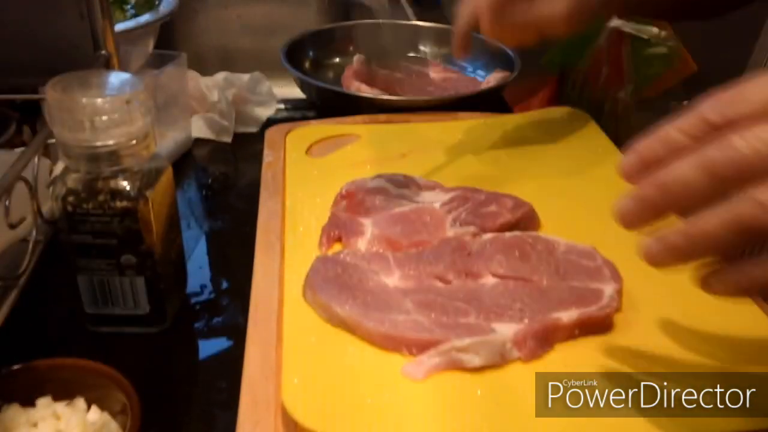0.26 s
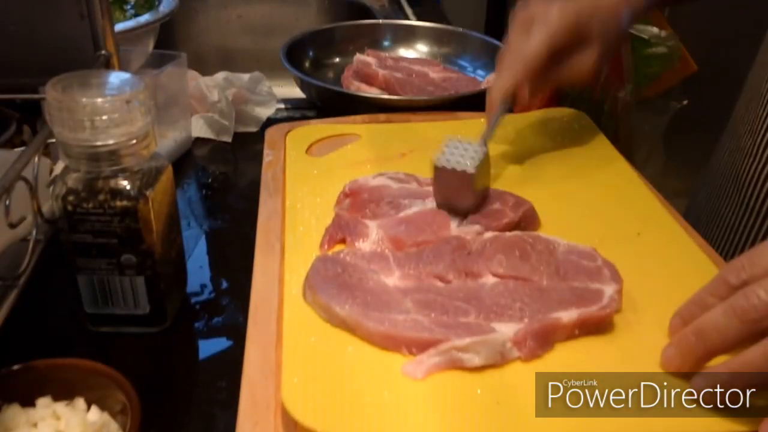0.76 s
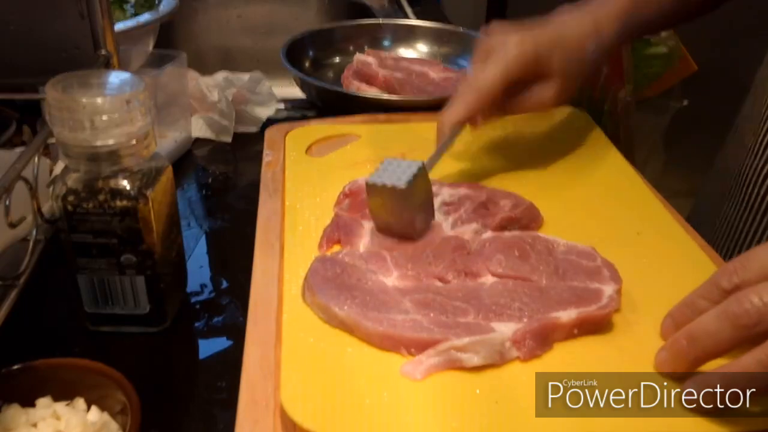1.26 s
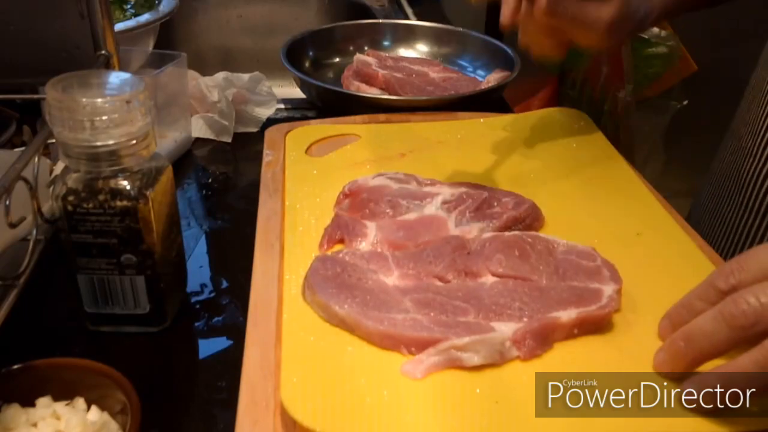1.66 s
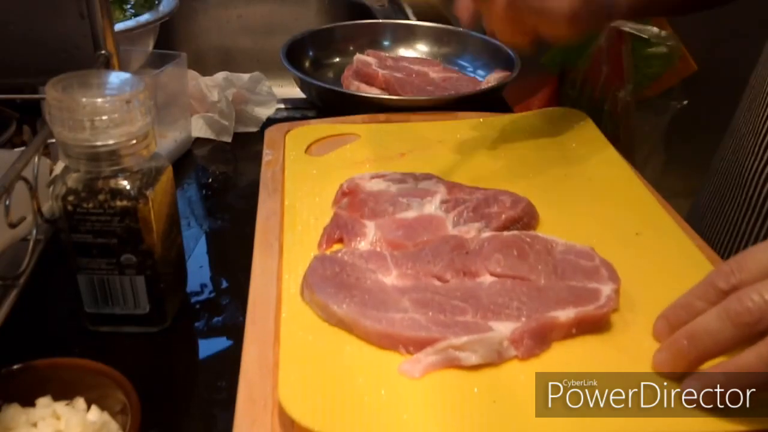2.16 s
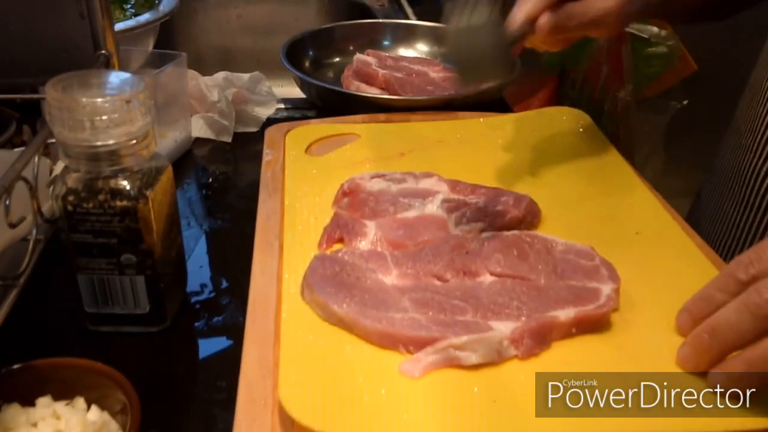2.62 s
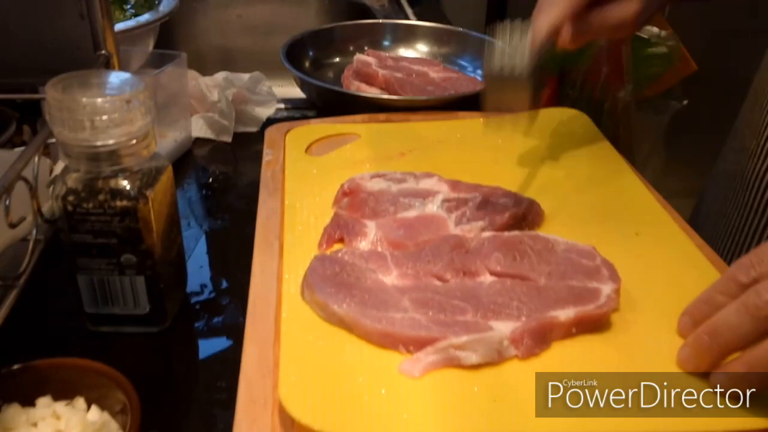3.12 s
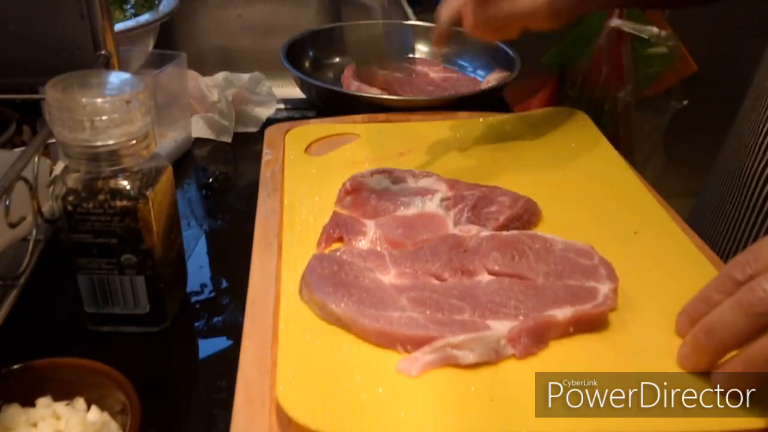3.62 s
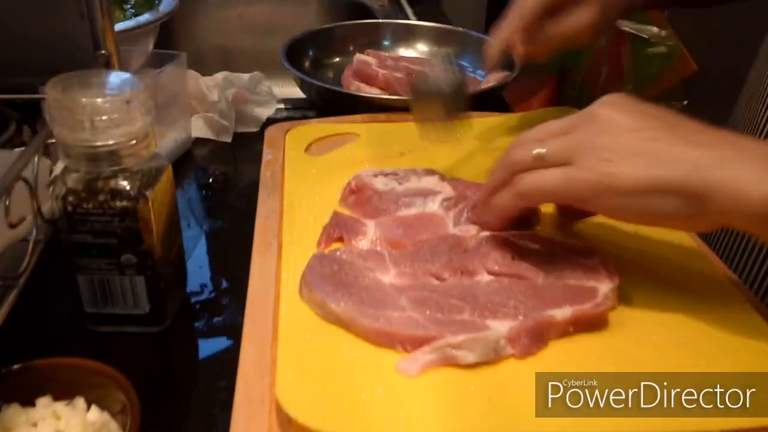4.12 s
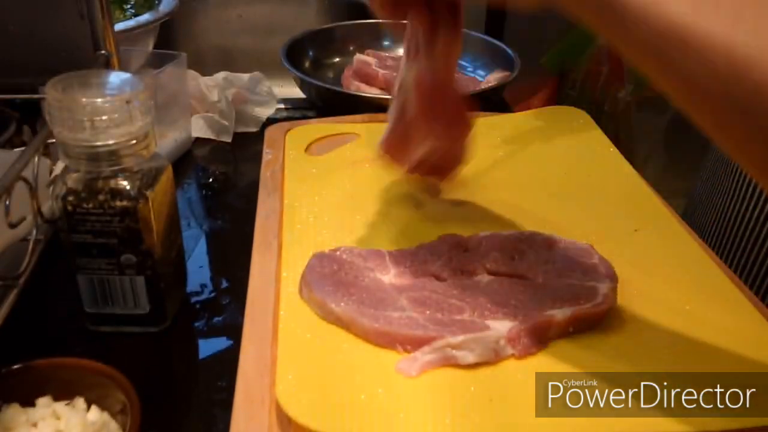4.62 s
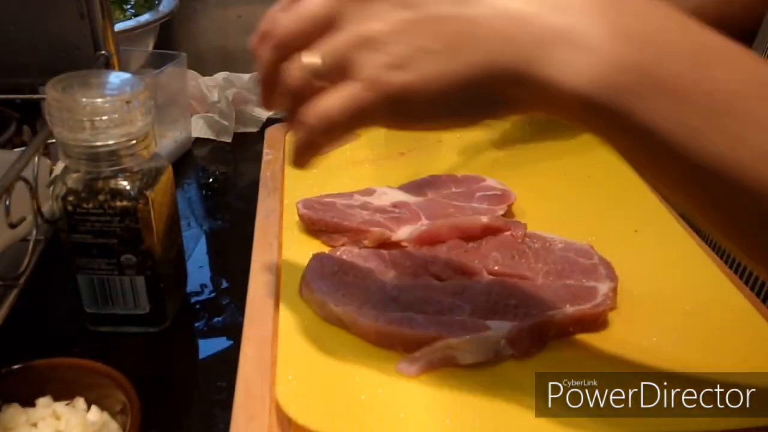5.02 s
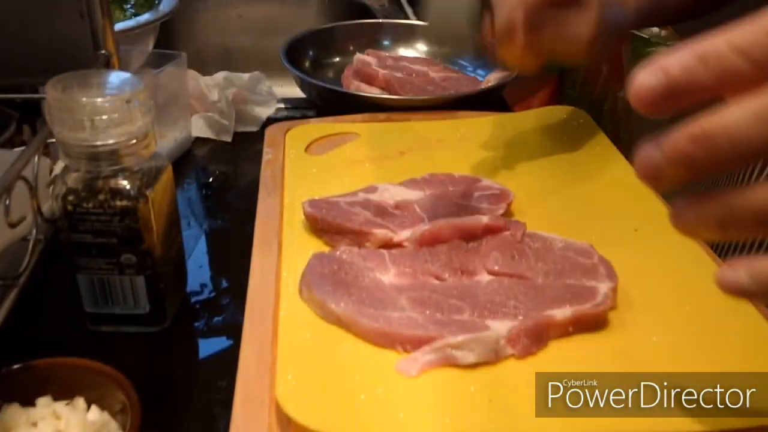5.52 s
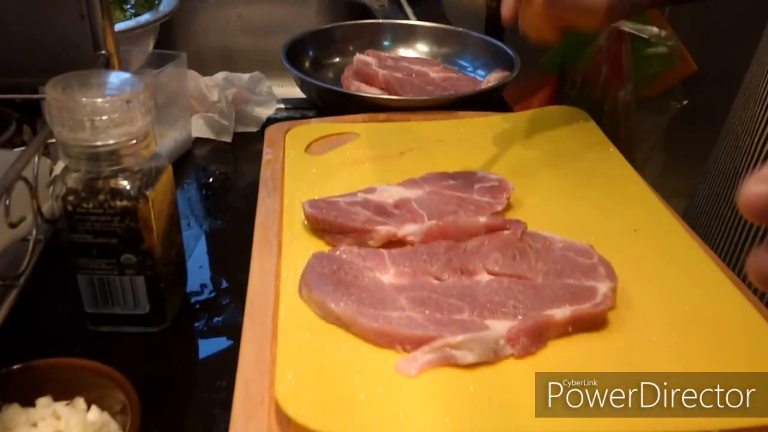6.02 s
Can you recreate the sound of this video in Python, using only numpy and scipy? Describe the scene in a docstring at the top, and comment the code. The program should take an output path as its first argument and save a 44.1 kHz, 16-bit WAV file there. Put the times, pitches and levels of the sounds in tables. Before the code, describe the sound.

A small kitchen, heard close in stereo, with constant low appliance hum and faint air hiss. At 0.16 s there is a soft pat of hand or meat; from about 0.38 s a toothed metal mallet strikes raw meat every quarter second, sixteen blows until 4.24 s. Each is a short wet crack with a squelchy edge, followed within hundredths of a second by hollow clattering knocks of plastic board on wooden block and a round low thump of the counter. The blows at 0.38 and 2.19 s slap harder; others are duller. Tiny wet ticks fall between. Around 4.02-4.1 s a glass jar clinks thinly. From 4.4 to 4.8 s the slice peels away in fine sticky crackles; a very faint far tone comes and goes until 5.06 s. A soft pat at 5.17 s lays it down, then four blows at 5.28, 5.54, 5.8 and 6.07 s, the last sharpest.

```python
"""A metal meat mallet pounds a pork slice on a plastic board, loose on a wooden block, in a small kitchen.
Each blow is a wet slap of noise with a squelching band; knocks ring board and block; counter modes thump below.
In a pause the slice is peeled off and turned in fine crackles; a jolted glass jar clinks with a few sine modes.
Steady hum and hiss of shaped noise, a faint far tone and dense noise-like room echoes fill the background.
Two close microphone ports listen, the right one shaded and a little behind."""
import sys
import numpy as np
from scipy import signal
from scipy.fft import rfft, irfft
from scipy.io import wavfile

SR = 44100
rng = np.random.default_rng(int(sys.argv[2]) if len(sys.argv) > 2 else 0)


def materialize(psi):
    """Save the field psi as 16-bit PCM at rate SR to the path in sys.argv[1].

    A 1-D psi becomes a single channel; in a 2-D psi each row is a channel.
    """
    bounded = np.clip(np.atleast_2d(psi).T, -1, 1)
    quanta = np.round(bounded * 32767).astype(np.int16)
    wavfile.write(sys.argv[1], SR, quanta)


N = 276507

# mallet blows, with their push on block and counter: start_s, slap_db, slap_brightness_db, squelch_hz,
# push_db, counter_tilt_db_per_octave
BLOWS = [(0.376, -16.5, -6.5, 6400, -25.5, -7.5), (0.6421, -23.5, 6, 6850, -24.5, -14.5),
         (0.9201, -28, 2.5, 5930, -29, -14.5), (1.1752, -36, 5, 4020, -26, -3.5),
         (1.4407, -25.5, -0.5, 5960, -30, -14.5), (1.71, -36, 0, 3910, -27, -9.5),
         (1.956, -28.5, -5.5, 5650, -29.5, -12), (2.192, -18.5, -9, 6630, -25.5, -7),
         (2.4541, -27, 2, 4660, -28.5, -10.5), (2.6945, -28, 1, 3480, -28, -4),
         (2.9547, -26.5, -0.5, 3560, -26.5, -12.5), (3.2288, -25, -8.5, 4020, -24.5, -9),
         (3.4682, -25, -11, 3860, -23, -8), (3.7196, -24.5, 6, 6520, -29, -6),
         (3.9653, -24, -5.5, 3530, -25, -11), (4.2391, -25.5, -5, 5760, -27, -6.5),
         (5.282, -24, 0.5, 3600, -25, -13), (5.5418, -26, 1, 3780, -26.5, -9.5),
         (5.8031, -23.5, -2.5, 3600, -31, -12), (6.0705, -16.5, -6.5, 5500, -26.5, -12.5)]

OPPOSITE = np.array([[1], [-1]])    # signs of a difference between left and right port


def from_db(db):
    """Decibels to gain."""
    return 10 ** (np.asarray(db) / 20)


def rms_one(x):
    """Scales to unit rms."""
    return x / np.sqrt(np.mean(x ** 2) + 1e-20)


def at_hz(points, hz):
    """Reads a (Hz, value) table on a log-frequency axis."""
    points_hz, values = np.array(points).T
    return np.interp(np.log(np.maximum(hz, 1)), np.log(points_hz), values)


def fft_hz():
    """Frequencies of the bins of a full-length spectrum."""
    return np.fft.rfftfreq(N, 1 / SR)


def resonate(x, hz, width_hz):
    """Two-pole resonance with gain of about 1 at its peak."""
    r = np.exp(-np.pi * width_hz / SR)
    zeros = np.array([1, 0, -1]) * (1 - r * r) / 2
    poles = [1, -2 * r * np.cos(2 * np.pi * hz / SR), r * r]
    return signal.lfilter(zeros, poles, x)


def high_pass(x, hz, order=1):
    """Butterworth high-pass."""
    return signal.sosfilt(signal.butter(order, hz, "high", fs=SR, output="sos"), x)


def add(out, start_s, sound):
    """Mixes a sound in at a time."""
    i = round(start_s * SR)
    out[..., i:i + sound.shape[-1]] += sound[..., :N - i]


def coloured(x, spectrum):
    """Shapes a signal by a spectrum whose mean power is set to 1."""
    gain = from_db(at_hz(spectrum, fft_hz()))
    return irfft(rfft(x) * rms_one(gain), N)


def burst(t60, rise_s, lumpy_db, first_db, bright_db, corner_hz, snap, snap_s):
    """A first hard contact, then lumpy noise that snaps up, drops and dies away, all within 0.2 s."""
    t = np.arange(int(.2 * SR)) / SR
    lumps = from_db(lumpy_db * np.minimum(rng.exponential(1, len(t)), 4))
    noise = rms_one(rng.standard_normal(len(t)) * lumps)
    rise = 1 - np.exp(-t / rise_s)
    decay = from_db(-60 * t / max(t60, .004))
    noise = noise * rise * decay * (1 + snap * np.exp(-t / snap_s))
    noise[0] = from_db(first_db)
    # the part above the corner is raised or lowered
    return noise + (from_db(bright_db) - 1) * high_pass(noise, corner_hz)


def hum():
    """Steady appliance hum and air noise, alike in both ports only in the bass."""
    # long-term colour of hum and air: frequency_hz, relative_level_db (per Hz)
    hum_spectrum = [(18, -66), (30, -8), (100, 5.5), (190, -13.5), (300, -4.5), (387, -9), (473, -20.5),
                    (536, -8.5), (724, -17.5), (800, -12.5), (907, -17), (1540, -20), (2900, -27.5),
                    (3600, -34), (6500, -40), (8000, -49.5), (12000, -51.5), (15600, -85.5), (22000, -120)]
    # how alike the ports hear it: frequency_hz, left_right_likeness (0 to 1)
    likeness = [(60, 0.98), (300, .9), (1000, 0.25), (3000, .2)]
    level_db = -53.5
    alike = np.clip(at_hz(likeness, fft_hz()), 0, 1)
    mid, side = rfft(coloured(rng.standard_normal((2, N)), hum_spectrum))
    ports = np.sqrt((1 + alike) / 2) * mid + np.sqrt((1 - alike) / 2) * side * OPPOSITE
    return from_db(level_db) * irfft(ports, N)


def slaps():
    """Many teeth squeeze juice and air out at once: a bright crack with one squelching band."""
    # softer pats of meat or hand, no push behind them: start_s, slap_db, slap_brightness_db, squelch_hz
    pats = [(0.1624, -27.5, 0.5, 3680), (5.1738, -36, 5, 6740)]
    # single teeth or wet fibres ticking apart from a blow: start_s, level_db
    ticks = [(0.208, -38.5), (0.209, -51), (1.0075, -48), (2.172, -51), (2.1819, -37.5), (2.186, -53),
             (2.773, -50), (3.0335, -63), (3.963, -37.5), (5.169, -42)]
    # colour of wet metal on meat: frequency_hz, relative_level_db (per Hz)
    slap_colour = [(180, -37.5), (300, -7.5), (1610, -7), (1900, -6), (3130, -5), (4160, -9), (4830, -7),
                   (6520, -8.5), (8360, -12.5), (12500, -11), (16000, -28)]
    slap_t60_s, tick_t60_s = 0.074, 0.015
    squelch_db, squelch_width_hz = -2, 570
    squelch_per_db, squelch_from_db = 0.37, -29.5     # harder slaps squelch more
    out = np.zeros((2, N))
    for start_s, level_db, bright_db, squelch_hz, *_ in BLOWS + pats:
        shared, apart = [burst(slap_t60_s, rise_s=0.0008, lumpy_db=1.1, first_db=7, bright_db=bright_db,
                               corner_hz=3000, snap=1.4, snap_s=0.0022) for _ in range(2)]
        crack = shared + 0.71 * apart * OPPOSITE      # the teeth are spread out, so the ports differ a little
        squelch_gain = from_db(squelch_db + squelch_per_db * (level_db - squelch_from_db))
        squelch = squelch_gain * resonate(crack, squelch_hz, squelch_width_hz)
        add(out, start_s, from_db(level_db) * (crack + squelch))
    for start_s, level_db in ticks:
        tick = burst(tick_t60_s, rise_s=0.0002, lumpy_db=2.6, first_db=8.5, bright_db=6.5,
                     corner_hz=2500, snap=1.03, snap_s=.002)
        add(out, start_s, from_db(level_db) * tick)
    return coloured(out, slap_colour)


def kitchen(x):
    """Echoes too dense to tell apart: stored power in each third-octave dies by the room's t60, heard as noise."""
    # how long the small kitchen rings: frequency_hz, t60_s
    room_t60 = [(150, 0.68), (500, 0.27), (1500, 0.22), (3000, 0.29), (4500, 0.24), (6500, 0.26),
                (8500, 0.21), (15000, 0.22)]
    # how alike the echoes reach both ports: frequency_hz, left_right_likeness (0 to 1)
    likeness = [(150, 0.71), (600, 0.79), (1500, 0.077), (4000, .1)]
    arrive_s = 0.00069      # the first echoes need time to arrive
    arrive = np.exp(-1 / (arrive_s * SR))
    out, edges_hz = 0, 150 * 2 ** (np.arange(21) / 3)
    white = rng.standard_normal((2, 2, N))      # neighbouring bands get unrelated noise
    for k, (low, high) in enumerate(zip(edges_hz, edges_hz[1:])):
        band = signal.butter(2, [low, high], "band", fs=SR, output="sos")
        mid, side = rms_one(signal.sosfilt(band, white[k % 2]))
        alike = np.clip(at_hz(likeness, low), 0, 1)
        keep = from_db(-120 / at_hz(room_t60, np.sqrt(low * high)) / SR)     # acts on power, hence 120
        power = signal.lfilter([1 - arrive], [1, -arrive], signal.sosfilt(band, x) ** 2)
        stored = signal.lfilter([1 - keep], [1, -keep], power)
        ports = np.sqrt(1 + alike) * mid + np.sqrt(1 - alike) * side * OPPOSITE
        out = out + np.sqrt(stored) * ports
    return out


def ring(contacts, modes):
    """Contacts ring a set of damped modes with alternating signs."""
    return sum((-1) ** k * from_db(db) * resonate(contacts, hz, width_hz)
               for k, (hz, width_hz, db) in enumerate(modes))


def knocks():
    """Bounces clatter and ring the damped modes of board and block; each push shakes block and bowl."""
    # board knocking on the block: start_s, drive_db, clatter_t60_s
    board_knocks = [(0.376, -7, 0.18), (0.391, -8, 0.12), (0.41, -2, 0.12), (0.647, 3.5, 0.082),
                    (0.656, -4, 0.11), (0.675, 1.5, 0.087), (0.921, -13.5, 0.16), (0.942, -2.5, 0.074),
                    (1.177, -16, 0.12), (1.195, -1, 0.067), (1.454, -3, 0.033), (1.466, -2, 0.069),
                    (1.712, -13.5, 0.17), (1.727, -4, 0.06), (1.978, -8, 0.11), (2.196, 2, 0.082),
                    (2.22, 4, 0.05), (2.233, -4, 0.041), (2.456, -2.5, 0.047), (2.474, -4, 0.095),
                    (2.696, -20, 0.15), (2.713, -7, 0.078), (2.955, -9, 0.12), (2.97, -3, 0.044),
                    (2.991, -6.5, 0.069), (3.23, -9.5, 0.16), (3.24, -5, 0.097), (3.473, -16, 0.13),
                    (3.483, -3, 0.13), (3.49, -5.5, 0.096), (3.723, -2, 0.12), (3.745, -0.5, 0.03),
                    (3.967, 5, 0.038), (3.982, -1.5, 0.098), (3.992, 4.5, 0.077), (4.249, -6, 0.14),
                    (4.263, -0.5, 0.087), (5.177, -29, 0.057), (5.243, -29.5, 0.09), (5.285, 3, 0.065),
                    (5.315, -0.5, 0.15), (5.539, -11.5, 0.2), (5.571, 1.5, 0.069), (5.802, -15.5, 0.24),
                    (5.844, -14, 0.038), (6.081, -5.5, 0.16), (6.101, 0, 0.092)]
    # modes of the plastic board on its block: pitch_hz, width_hz, level_db
    board_modes = [(627.6, 260, -3.5), (684, 98, 5.5), (773, 55, -0.5), (975, 160, -1.5), (1210, 77, -3.5),
                   (1540, 190, -1), (1886, 174, 2), (1927, 224, -2.5), (2260, 340, -6), (2520, 450, -11),
                   (3150, 160, -10.5), (4280, 210, -19)]
    # low modes of the wooden block, shaken by each push: pitch_hz, width_hz, level_db
    block_modes = [(185, 6.8, -1.5), (216, 14, 0.5), (284, 23, 0), (314.5, 13.1, 8), (353, 23, 1.5),
                   (438.7, 29.5, 0.5), (527, 9.4, 1)]
    # a steel bowl on the counter hums after each push: pitch_hz, width_hz, level_db
    bowl_modes = [(545, 3.2, -7)]
    # sharper modes of the wooden block, rung by the knocks: pitch_hz, width_hz, level_db
    linger_modes = [(654, 13, 0.5), (756, 8, -7.5), (814, 5.4, -9.5), (955, 28, -6.5), (1044, 10, 0.5),
                    (1270, 10, -7), (1623, 47, -5.5), (1732, 44, -4), (1810, 4.8, -13), (2130, 46, -14.5),
                    (2490, 15, -14.5), (3160, 14, -18.5)]
    # harder knocks are brighter, those further in time from a blow duller
    knock_bright_db, bright_per_db, dulling_db_per_s = 1, 0.87, 201
    block_lag_s, block_t60_s, block_over_push_db = 0.00802, 0.12, 22.5
    out = np.zeros((2, N))
    pushes, bounces = np.full((2, N), 1e-18)
    blow_s = np.array(BLOWS)[:, 0]
    for start_s, level_db, t60 in board_knocks:
        from_blow_s = np.min(np.abs(start_s - blow_s))
        bright_db = knock_bright_db + bright_per_db * level_db - dulling_db_per_s * from_blow_s
        shared, apart = [burst(t60, rise_s=0.0015, lumpy_db=2.7, first_db=19.5, bright_db=bright_db,
                               corner_hz=1280, snap=1.0, snap_s=0.0024) for _ in range(2)]
        # the board is wide, so the ports hear partly different contacts, but long waves reach both alike
        apart = high_pass(apart, 1200)
        contacts = from_db(level_db) * (shared + 0.97 * apart * OPPOSITE)
        # hand and meat detune the modes from blow to blow; here each knock draws afresh
        spread_db, detune = rng.standard_normal((2, len(board_modes))) * [[1.5], [.03]]
        varied = [(hz * (1 + detune[k]), width_hz, db + spread_db[k])
                  for k, (hz, width_hz, db) in enumerate(board_modes)]
        add(out, start_s, ring(contacts, varied))
        add(bounces, start_s, from_db(level_db) * shared)
    for start_s, *_, push_db, _ in BLOWS:
        shake = burst(block_t60_s, rise_s=0.002, lumpy_db=3.9, first_db=15, bright_db=-8.5,
                      corner_hz=1280, snap=.3, snap_s=0.0043)
        add(pushes, start_s + block_lag_s, from_db(push_db + block_over_push_db) * shake)
    return out + ring(pushes, block_modes + bowl_modes) + ring(bounces, linger_modes)


def thumps():
    """The meat cushions the blow to a smooth push that swells the counter's low modes in step."""
    # low modes of the counter: pitch_hz, level_db, t60_s
    counter_modes = [(53, -10, 0.27), (64.43, -0.5, 0.35), (89.5, 4, 0.2), (101.84, -3.5, 0.33),
                     (111.65, 6, 0.38), (110, -19.5, 0.1)]
    push_lag_s, push_s = .005, 0.02     # the push starts after the slap and swells
    out, t = np.zeros(N), np.arange(SR // 2) / SR
    swell = np.sin(np.pi / 2 * np.clip(t / push_s, 0, 1)) ** 2
    for start_s, *_, push_db, tilt_db in BLOWS:
        spread_db = 1.53 * rng.standard_normal(len(counter_modes))
        rings = 0
        for k, (hz, db, t60) in enumerate(counter_modes):
            gain = from_db(db + spread_db[k] + tilt_db * np.log2(hz / 85) - 60 * t / t60)
            # all modes cross zero the same way 4 ms in
            rings = rings + gain * np.sin(2 * np.pi * hz * (t - .004))
        add(out, start_s + push_lag_s, -from_db(push_db) * swell * rings)
    return out


def jar():
    """Thin glass modes, struck alike at every jolt."""
    # a glass jar on the counter is jolted: start_s, level_db
    clinks = [(4.015, -47), (4.038, -51.5), (4.055, -54), (4.082, -69), (4.1, -68)]
    # modes of the glass: pitch_hz, level_db, t60_s
    glass_modes = [(5450, 1, .1), (5950, 5.5, .1), (10400, -17, .06)]
    out, t = np.zeros(N), np.arange(SR // 4) / SR
    for start_s, level_db in clinks:
        clink = sum(from_db(level_db + db - 60 * t / t60) * np.sin(2 * np.pi * hz * t)
                    for hz, db, t60 in glass_modes)
        add(out, start_s, clink)
    return out


def peel():
    """Wet meat lets go of the plastic in fine crackles that build up, then stop faster."""
    # the sticky slice peeled off, lifted and laid down: loudest_s, level_db, centre_hz, spray_db (against level)
    peels = [(4.44, -61.5, 3000, -29), (4.493, -49, 3900, -23), (4.535, -73, 6500, 0.5),
             (4.705, -68, 6000, -3), (4.765, -59.5, 5960, -3), (5.17, -66.5, 4100, -13.5)]
    rise_db_per_s, fall_db_per_s = 263, 455
    clump_s, clump_db = 0.0048, 3.5
    out, t = np.zeros(N), np.arange(N) / SR
    grains = from_db(4.0 * np.minimum(rng.exponential(1, N), 4))
    crackle = rms_one(rng.standard_normal(N) * grains)
    clumps = rng.standard_normal(int(N / SR / clump_s) + 2)
    crackle = crackle * from_db(clump_db * np.interp(t / clump_s, np.arange(len(clumps)), clumps))
    bands = []
    for hz in (1200, 2250, 3200, 4400, 5460, 6900):
        narrowed = resonate(resonate(crackle, hz, 0.24 * hz), hz, 0.31 * hz)
        bands.append((hz, rms_one(narrowed)))
    spray = rms_one(resonate(crackle, 11500, 3000))
    for loudest_s, level_db, centre_hz, spray_db in peels:
        drop_db = np.maximum(rise_db_per_s * (loudest_s - t), fall_db_per_s * (t - loudest_s))
        # bands fall by 14 dB per octave away from the centre
        body = sum(x * from_db(-14.0 * np.abs(np.log2(hz / centre_hz))) for hz, x in bands)
        out += from_db(level_db - drop_db) * (body + from_db(spray_db) * spray)
    return out


def faint_tone():
    """A thin, nearly pure tone somewhere in the distance, swelling and fading."""
    # each time the far tone is heard: start_s, length_s, pitch_hz, level_db
    faint_tones = [(4.56, 0.12, 770, -63), (4.73, .07, 837, -66), (4.9, 0.16, 790, -63)]
    out = np.zeros(N)
    for start_s, length_s, hz, level_db in faint_tones:
        t = np.arange(int(length_s * SR)) / SR
        swell = np.sqrt(np.sin(np.pi * t / length_s))
        add(out, start_s, from_db(level_db) * swell * np.sin(2 * np.pi * hz * t))
    return out


def scene():
    """All sources; the direct sound reaches the right port round the housing, with its phase behind."""
    # how far the left port leads: frequency_hz, phase_radians
    port_phase = [(60, .1), (200, .3), (700, 0.29), (1500, 0.3), (2500, 0.99), (4500, 1.62), (9000, 2.6),
                  (15000, 1.1)]
    crack, clatter = slaps() + peel() + jar(), knocks()
    near = crack + clatter + thumps()
    lag = np.exp(-1j * at_hz(port_phase, fft_hz()))
    near[1] = irfft(rfft(near[1]) * lag, N)
    to_room = from_db(-11.5) * crack.mean(axis=0) + from_db(-14.0) * clatter.mean(axis=0)
    return near + kitchen(to_room) + hum() + faint_tone()


def record(dry):
    """Shades the right port, loses the deepest bass, adds the housing's peak and notch, rounds peaks, cuts the top."""
    # right port against the left: frequency_hz, level_db
    right_port = [(100, 0.3), (300, -0.1), (700, -1), (1500, 1.5), (5000, 0.5), (8000, 2), (9500, -6.5),
                  (15000, -15)]
    cutoff_hz = 16700
    shade = from_db(at_hz(right_port, fft_hz()))
    ports = np.array([dry[0], irfft(rfft(dry[1]) * shade, N)])
    ports = high_pass(ports, 40, order=2)
    notch, peak = 0.53 * resonate(ports, 8300, 1000), 0.37 * resonate(ports, 6600, 1200)
    rounded = 0.58 * np.tanh((ports - notch + peak) / 0.63)
    return signal.sosfilt(signal.cheby2(12, 70, cutoff_hz, fs=SR, output="sos"), rounded)


dry = scene()
out = record(dry)
materialize(out)
```